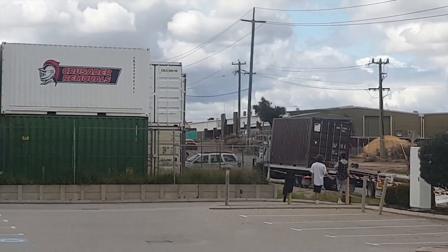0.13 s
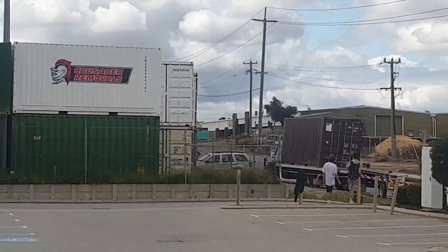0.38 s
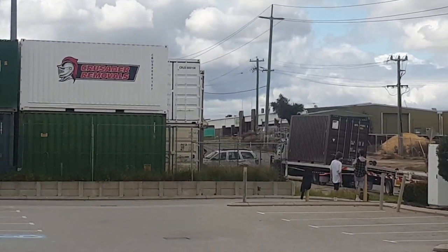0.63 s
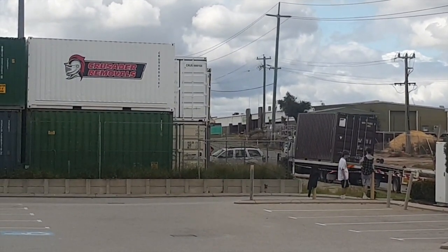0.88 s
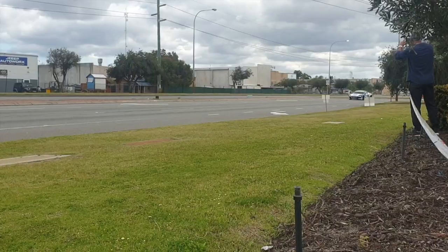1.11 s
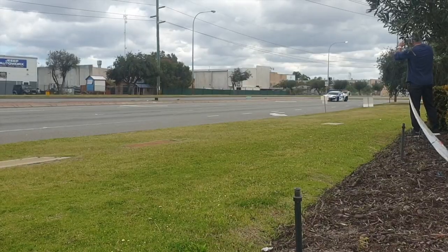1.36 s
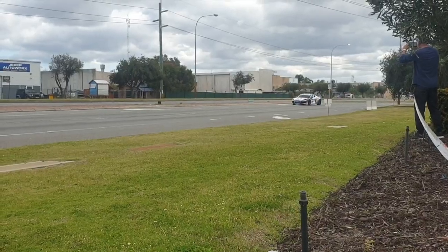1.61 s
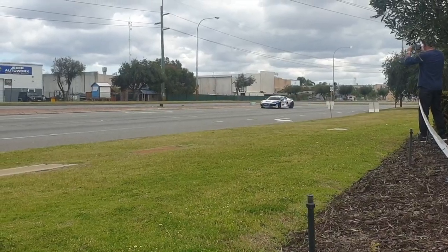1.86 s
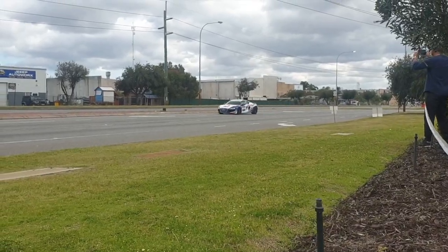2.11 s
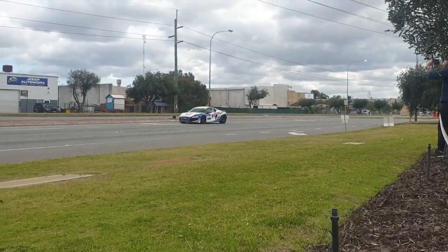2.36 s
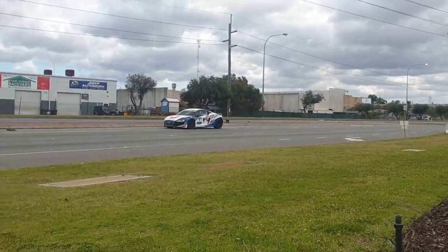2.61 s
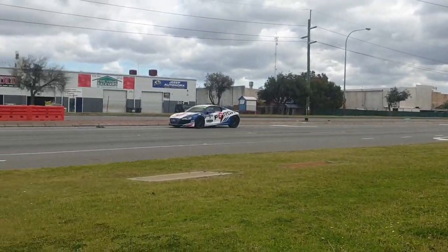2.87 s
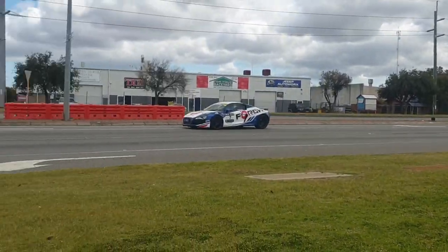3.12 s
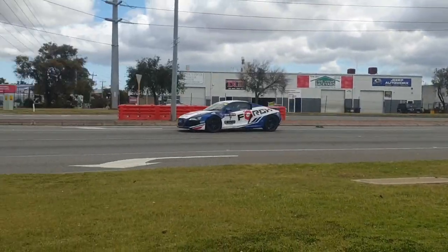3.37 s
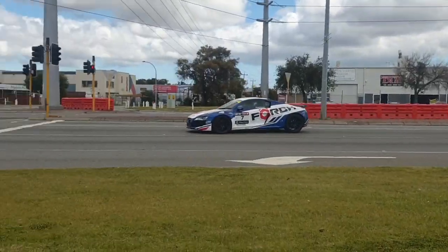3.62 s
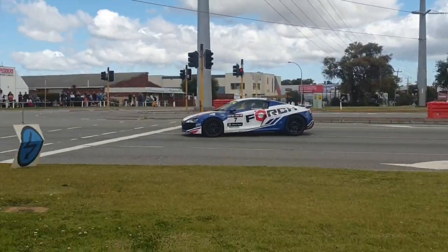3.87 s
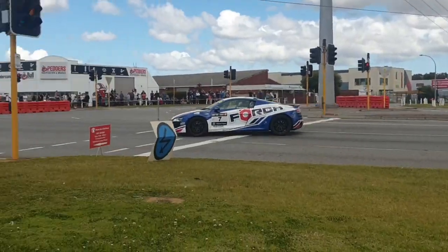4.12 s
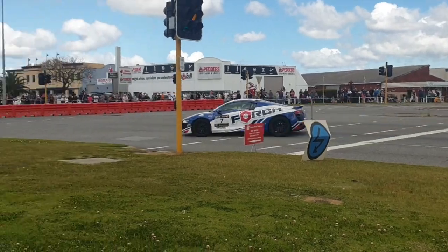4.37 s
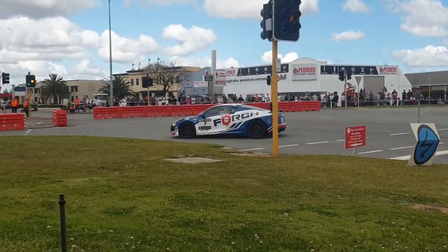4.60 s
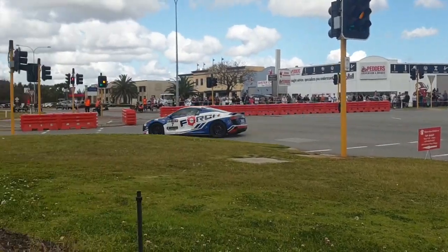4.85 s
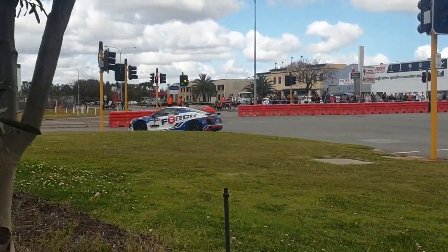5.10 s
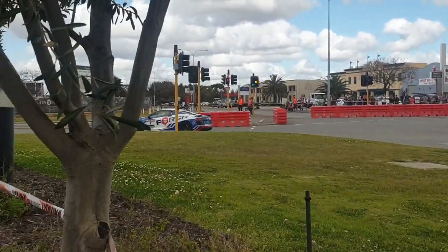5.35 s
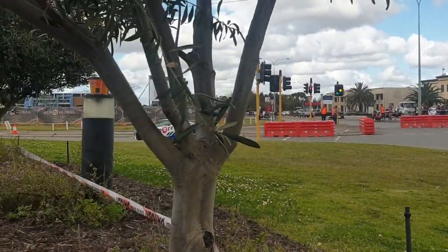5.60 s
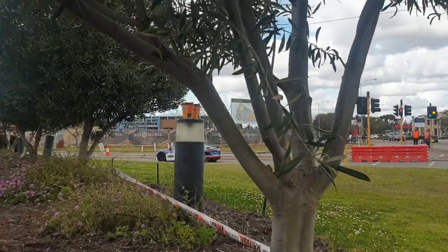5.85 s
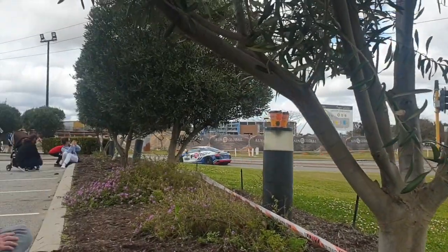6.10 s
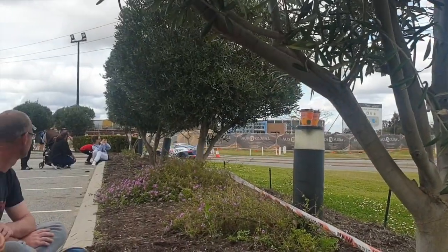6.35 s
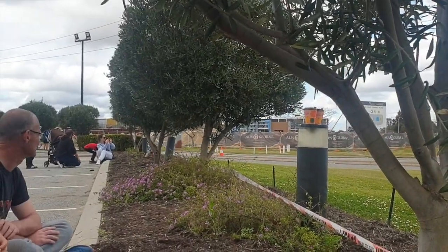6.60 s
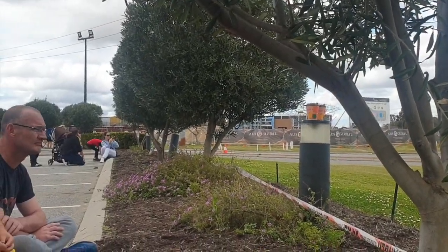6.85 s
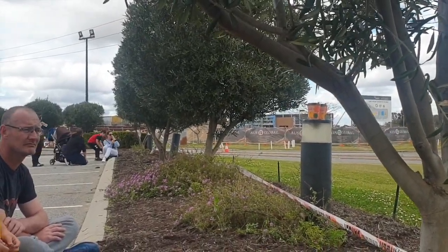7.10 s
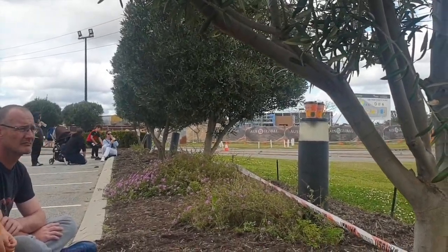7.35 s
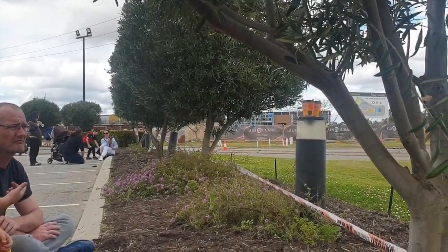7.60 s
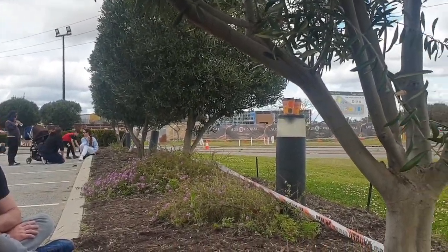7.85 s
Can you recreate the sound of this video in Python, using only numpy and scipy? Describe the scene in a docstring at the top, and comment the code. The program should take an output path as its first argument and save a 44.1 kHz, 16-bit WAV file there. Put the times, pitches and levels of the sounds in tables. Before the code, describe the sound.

Rough V8 roar stops abruptly; after a tiny gap a smoother, buzzy race engine brakes, blips, sweeps past and fades off into the distance.

```python
"""You hear a V8 race car pull hard past a yard, then a click and a short gap. After it a five-cylinder
race car brakes, blips a downshift, coasts round a corner between buildings and accelerates away.
Each exhaust is a stack of sines at multiples of the firing rate. Roar, hiss and wind are shaped noise.
The second car also has late echoes from far walls and two thin ticks close by."""
import sys
import numpy as np
from scipy import signal
from scipy.fft import next_fast_len
from scipy.io import wavfile
from scipy.ndimage import uniform_filter1d

SR = 44100
rng = np.random.default_rng(int(sys.argv[2]) if len(sys.argv) > 2 else 0)


def attenuation_scalar(level_db):
    """Turn a level in dB into a linear amplitude multiplier (20 dB per decade)."""
    decades = np.asarray(level_db, float) / 20
    return 10 ** decades


def dump_mix(stems):
    """Bounce the given channels to the path in sys.argv[1] as a 16-bit WAV at rate SR."""
    frames = np.atleast_2d(stems).T  # one column per channel
    limited = np.clip(frames, -1, 1)  # hard clip at full scale
    pcm = np.round(limited * 32767).astype(np.int16)
    wavfile.write(sys.argv[1], SR, pcm)


N = 351477

# How often a cylinder fires. Each row: time in seconds, firing rate in Hz.
V8_RATE = [(0, 277.5), (.8, 295.9), (.98, 297.8)]
FIVE_RATE = [(1.0, 279), (1.3, 260), (1.8, 234.5), (2.15, 164.3), (2.29, 147), (2.36, 153.4), (2.45, 168.5),
             (2.57, 205.4), (2.71, 257), (2.78, 253.2), (3.1, 231), (3.5, 212.9), (3.9, 195), (4.3, 183.5),
             (4.52, 178.5), (4.66, 181.3), (4.82, 175.1), (4.98, 182.8), (5.14, 178.6), (5.3, 193.9),
             (5.46, 190.8), (6.1, 210.3), (7.1, 253.3), (7.85, 282.8), (7.97, 291.5)]
# The firing tone before its brief dips and swells. Each row: time in seconds, rms level in dB.
V8_TONE = [(0, -21), (0.301, -23), (.4, -19), (.98, -19)]
FIVE_TONE = [(1, -17.5), (1.06, -11.5), (1.6, -11), (1.95, -12.5), (2.2, -20.5), (2.34, -22.5),
             (2.49, -15.5), (2.62, -10), (2.9, -11.5), (3.598, -13), (4, -13), (4.6, -14.5), (5, -13),
             (5.46, -13), (5.75, -15.5), (5.85, -18.5), (6.15, -19.5), (6.27, -16), (6.79, -19),
             (6.92, -22.5), (7.45, -21), (7.8, -15.5), (7.97, -21)]
# Brief dips or swells of the firing tone, as reflections cancel or join it and when the throttle lifts.
# Each row: time in seconds, change in dB, width in seconds.
BEATS = [(.12, -4, 0.019), (.33, -8, 0.013), (.6, 8, 0.021), (.8, 6, 0.033), (.91, -3.5, 0.017),
         (1.04, -13, 0.0056), (1.14, -16.5, 0.08), (1.29, -4, 0.051), (1.475, -12, 0.041),
         (1.75, -4.5, 0.063), (1.91, -9, 0.031), (2.01, -22.5, 0.014), (2.14, -10, 0.017), (2.28, -8, 0.05),
         (2.45, -17, 0.013), (4.64, -6, 0.018), (4.745, -20.5, 0.043), (4.84, -15, 0.038),
         (5.14, -6.5, 0.038), (6.38, -3.5, .035), (7.59, -10.5, 0.14)]
# The other exhaust tones. Each row: time in seconds, rms level in dB at zero effort of the tones at
# 2, 3 and 4 times the firing rate, base level in dB of the remaining orders, their lift in dB per
# octave from the firing tone.
V8_LOAD = [(0, -31.5, -34, -59, -56, 8.77), (.45, -27.5, -31.5, -40, -52.5, 5.8),
           (.65, -26.5, -34, -40.5, -46.5, 1.1), (.98, -28.5, -36.5, -47, -44, 0.21)]
FIVE_LOAD = [(1, -48, -55, -67, -44.5, 0.8), (1.2, -41.5, -44, -68, -43.5, 1.7),
             (1.6, -37, -49, -71, -41.5, -0.3), (2, -31, -58, -58.5, -46, 3.5),
             (2.35, -35, -59.5, -59, -46, 0), (2.66, -29.5, -36.5, -42.5, -35.5, 0.3),
             (2.9, -56, -45, -57.5, -41.5, 2), (3.2, -37.5, -40, -41, -43, 0.8),
             (3.55, -38, -56, -58.5, -49, 7), (3.9, -28.5, -59, -47.5, -47.5, 7),
             (4.3, -33.5, -52, -51, -45.5, 4.5), (4.65, -37, -39.5, -52, -42, 1.4),
             (5.1, -29, -63, -47.5, -37.5, -2.5), (5.24, -24.5, -51.5, -44.5, -45, .1),
             (5.5, -26, -43, -40, -48, 5.5), (5.699, -35.5, -44, -47.5, -52, 3),
             (6, -37, -47.5, -54, -46, -1.8), (6.35, -42.5, -45, -49, -52, -5),
             (6.8, -43, -41.5, -47.5, -52.5, 7), (7.15, -43, -51, -67, -50.5, 6.5),
             (7.47, -38.5, -34, -53, -51.5, 9), (7.97, -34.5, -49.5, -56, -49.5, 5.5)]
# Remaining orders: those between the whole multiples, from unequal cylinders and pipes, and whole
# multiples from the 5th up. Each row: multiple of the firing rate, level in dB over the base level.
V8_ORDERS = [(0.25, 11.5), (0.499, 12.5), (0.75, 11.5), (1.248, -0.5), (1.501, 5), (1.748, -12.5),
             (2.252, -5.5), (2.5, 2), (2.751, -4.5), (3.25, -19.5), (3.5, -24.5), (3.75, -34.5),
             (4.249, -14.5), (4.5, 6.5), (4.75, -18.5), (5.002, -2), (5.254, -6), (5.5, 0.5), (5.75, -6),
             (5.999, 0), (6.25, -16), (6.498, -12.5), (6.752, -16.5), (7.0, -3), (7.249, -13),
             (7.499, -4.5), (7.75, -19.5), (8.0, -6.5)]
FIVE_ORDERS = [(0.2, -23.5), (0.4, -7), (0.6, 1.5), (0.8, 1.5), (1.2, 1), (1.4, -3), (1.6, 1), (1.8, -1),
               (2.199, -9), (2.4, -11), (2.6, -7.5), (2.8, -10.5), (3.2, -13), (3.4, -9), (3.6, -18.5),
               (3.8, -17), (4.2, -17.5), (4.4, -20), (4.6, -28), (4.8, -23), (5.0, -16.5), (5.201, -27.5),
               (5.398, -24), (5.6, -35), (5.8, -25.5), (6.0, -16.5), (6.2, -21), (6.4, -20.5), (6.6, -34.5),
               (6.8, -23), (7.0, -21.5), (7.198, -27), (7.399, -33), (7.6, -32), (7.799, -31), (8.0, -33.5)]
# The V8's highest orders. Each row: multiple of the firing rate, level in dB over the base level.
V8_RASP = [(8.5, -3.5), (9, -8), (9.5, -9.5), (10, -11), (10.5, -13.5), (11, -13), (11.5, -11), (12, -16),
           (13, -17), (14, -15.5)]
# Colour of the remaining orders. Each row: frequency in Hz, gain in dB.
PIPE = [(90, -12), (130, -7), (170, 12), (300, 2.5), (600, -3.5), (1000, -0.5), (1400, -3.2), (1700, -9)]
# Smearing and flutter of the exhaust tones, stronger far off, at the shift and on lifting.
# Each row: time in seconds, roughness from 0 to 1.
V8_ROUGH = [(0, .2), (.98, .2)]
FIVE_ROUGH = [(1, .4), (1.3, .13), (1.9, .2), (2.2, .35), (2.6, .16), (2.8, .04), (4.56, .04), (4.64, .2),
              (4.84, .22), (4.95, .06), (5.7, .07), (6.1, .13), (7.1, .16), (7.5, .35), (7.97, .25)]
# How the cars are driven. Each row: time in seconds, nearness in dB, effort of the engine in dB.
V8_DRIVE = [(0, -9.5, -3), (.1, -2.8, 2.6), (.45, -0.5, 2.3), (.88, -7.5, -3.7), (.98, -3, 1.5)]
FIVE_DRIVE = [(1, -26.5, 4.5), (1.75, -20.5, -3.5), (2.15, -14, -4), (2.38, -4, 1.5), (2.602, -4, 6.5),
              (2.67, -3.5, 9), (2.8, -6.5, 4.5), (3.2, -4.5, 1.3), (3.899, 2, -2), (4.57, 1, -5),
              (4.63, -4, -2.8), (4.798, -1, -8.5), (5, -2, -2), (5.17, -1.5, -6.5), (5.24, -5.5, 3),
              (5.55, -6.5, 5), (5.7, -10, 2.5), (6.05, -17, 2), (6.65, -19.5, 1.1), (7.1, -23.5, 6.5),
              (7.35, -24, 5.5), (7.97, -23.5, 8)]
# Noise levels: exhaust roar, then tyre and intake hiss, then top air. Each row: level in dB at zero
# nearness and effort, dB added per dB of nearness, dB added per dB of effort.
V8_RUSH = [(-37, 0.5, -1), (-35, 1.03, -0.16), (-69, 2.1, .3)]
FIVE_RUSH = [(-48, 0.067, 0.97), (-43, 0.27, 0.91), (-54, 0.32, .3)]
# Shapes of the noise spectra. Each row: frequency in Hz, relative density in dB per Hz.
WIND = [(20, -23.5), (45, -5.5), (70, 5.5), (120, 3.5), (250, -15), (500, -55.5)]
ROAR = [(60, -15.5), (120, 1.5), (350, 0), (700, -8.5), (1300, -10.5), (1700, -18.5), (2400, -16.5),
        (3500, -24), (5000, -49)]
V8_HISS = [(880, -28), (1500, -1), (1650, -1.5), (1850, -13.5), (2400, 0.5), (2620, -9), (3330, -3),
           (4080, -8), (5500, -11), (8500, -28), (11000, -75.5), (18700, -120)]
FIVE_HISS = [(880, -36.5), (1500, -17), (1720, -11), (2170, -2), (2460, -12.5), (3100, -3), (3510, -3),
             (5460, -3), (6940, -9.5), (8500, -21.5), (11000, -47.5), (18700, -120)]
AIR = [(4410, -28.5), (7500, 5.5), (7930, -1), (11200, 0), (12600, -3), (15600, -5)]
# Wind gusts. Each row: time in seconds, dB over calm, width in seconds.
GUSTS = [(0, 14.5, .15), (.35, 9, 0.15), (.93, 18, 0.11), (1.35, 9.5, 0.66), (2.78, 8, .25),
         (4.62, 10.5, 0.12), (5.58, 4.5, 0.053), (6.45, 4.5, 0.14), (7.45, -6, 0.36)]
# Brief swells of the treble. Each row: time in seconds, air change in dB, hiss change in dB,
# width in seconds.
FLURRIES = [(5.236, 1.5, 6, 0.012), (5.275, 1.2, 4, .015), (5.345, 1.2, 3, 0.023), (5.43, 0.5, 3.5, .025),
            (5.48, 0.3, 3.5, .012), (5.55, 1.7, 3.5, 0.018), (5.849, 5.5, 4.5, .06), (6.22, 10, 5, 0.09),
            (6.48, 8.5, 5.5, 0.11), (7, 0.7, 2.5, 0.12)]
# The two microphone ports. Each row: frequency in Hz, likeness of left and right from 0 to 1 before
# the diffuse share is applied, lead of left in radians, dB by which left is louder.
V8_PORTS = [(40, 0.4, 0.32, 8.5), (130, .88, -0.26, 2), (284, 1, 0.21, 2), (640, 0.48, -0.59, 2.5),
            (1850, 0.43, -0.62, 3), (3920, 0.62, 0.9, 3.5), (7000, 0.26, 0.72, 0), (15000, .2, 1.4, -2.5)]
FIVE_PORTS = [(60, 0.16, 0.76, 4.5), (121, 0.98, -0.1, 1.1), (267, 0.9, 0.22, 1.5), (604, 0.6, -0.25, 1.5),
              (1770, 0.19, 0.52, 5), (3220, 1, -1.9, 2), (6000, .8, -1.76, -2.5), (9000, .35, -1.5, -3),
              (15000, 0.25, -1.4, -3)]
# Thin ticks close by. Each row: start in seconds, peak level in dB.
TICKS = [(5.8385, -32), (5.899, -39)]


def evened(x):
    """Scale a signal to an rms of one."""
    return x / np.sqrt(np.mean(abs(x) ** 2) + 1e-20)


def read(points, hz):
    """Read every column of a frequency table at hz, on a log scale."""
    f, *values = np.transpose(points)
    return [np.interp(np.log(hz + 1), np.log(f + 1), value) for value in values]


def follow(rows, t):
    """Read every column of a time table at the times t."""
    s, *values = np.transpose(rows)
    return [np.interp(t, s, value) for value in values]


def bumps(rows, t):
    """Bell-shaped changes of level, in dB."""
    return sum(db * np.exp(-((t - s) / width) ** 2) for s, db, width in rows)


def ports(table, hz, a, b, diffuse=0.99):
    """Left and right microphone port from two unrelated complex signals: the right shares part of a."""
    likeness, lead, left_db = read(table, hz)
    likeness = 1 - diffuse * (1 - np.clip(likeness, 0, 1))
    half = attenuation_scalar(left_db / 2) * np.exp(.5j * lead)  # each side takes half of the difference
    right = likeness * a + np.sqrt(1 - likeness ** 2) * b
    return np.array([a * half, right / half])


def fading(count, width_hz, rate):
    """Slow complex chance: reflected paths drifting in and out of phase."""
    size = next_fast_len(count)
    spectrum = rng.standard_normal((size, 2)) @ [1, 1j]
    slowing = 1 + (np.fft.fftfreq(size, 1 / rate) / width_hz) ** 2
    return evened(np.fft.ifft(spectrum / slowing)[:count])


def rush(size, layers, pair, patchy_db, flicker_db, near_db):
    """Rushing noise from random short-time spectra; the air takes treble from far sound.
    Each layer is (spectrum shape, band in Hz that sets its level, dB curve)."""
    dulling = 0.046  # dB per kHz for each dB of lost nearness
    hop = size // 4
    count = len(layers[0][2])
    frames, hz = count // hop + 5, np.fft.rfftfreq(size, 1 / SR)
    at = np.minimum(np.arange(frames) * hop, count - 1)
    power = 0
    for shape, (low_hz, high_hz), level_db in layers:
        gain = attenuation_scalar(read(shape, hz)[0])
        gain /= np.sqrt(np.sum(gain[(hz > low_hz) & (hz < high_hz)] ** 2))
        power = power + np.outer(gain, attenuation_scalar(level_db[at])) ** 2
    power = power * attenuation_scalar(dulling * np.outer(hz / 1000, near_db[at])) ** 2

    a, b, c, d, patches = rng.standard_normal((frames, len(hz), 5)).T
    patches = uniform_filter1d(patches, size=size // 64, axis=0)
    patches = evened(uniform_filter1d(patches, size=2048 // hop, axis=1))
    flicker = evened(uniform_filter1d(rng.standard_normal(frames), size=3))  # shared by all bins
    unsteady = attenuation_scalar(patchy_db * patches + flicker_db * flicker)
    spectra = ports(pair, hz[:, None], a + 1j * b, c + 1j * d) * np.sqrt(power) * unsteady
    return signal.istft(spectra, nperseg=size, noverlap=size - hop)[1][:, :count]


def wind_roar_and_hiss(count, drive, layers, hiss, firing, pair, gate):
    """Wind and roar below; above them hiss and air that swell at the firing rate, by the share `gate`.
    Nearness and effort set the levels of all but the wind."""
    calm_db = -51
    t = np.arange(count) / SR
    near_db, effort_db = follow(drive, t)
    roar_db, hiss_db, air_db = (db + a * near_db + b * effort_db for db, a, b in layers)
    wind_db = calm_db + bumps(GUSTS, t)
    air_db = air_db + bumps([(s, db, width) for s, db, _, width in FLURRIES], t)
    hiss_db = hiss_db + bumps([(s, db, width) for s, _, db, width in FLURRIES], t)
    low = rush(2048, [(WIND, (30, 100), wind_db), (ROAR, (900, 1800), roar_db)],
               pair, patchy_db=1.5, flicker_db=1.33, near_db=near_db)
    high = rush(256, [(hiss, (2000, 7500), hiss_db), (AIR, (8000, 15000), air_db)],
                pair, patchy_db=2.0, flicker_db=0.84, near_db=near_db)
    firing_hz, = follow(firing, t)
    swelling = 1 + gate * np.cos(2 * np.pi * np.cumsum(firing_hz) / SR)
    return np.pad(low + high * swelling, [(0, 0), (0, N - count)])


def ticks():
    """Very short bright clicks: a 12.5 kHz wave inside a narrow bell."""
    out = np.zeros(N)
    t = np.arange(-40, 40) / SR
    click = np.exp(-(t / .00015) ** 2) * np.cos(2 * np.pi * 12500 * t)
    for s, db in TICKS:
        out[round(s * SR):][:len(t)] += attenuation_scalar(db) * click
    return out


def street(x, delay_s=0.21, t60=1.9):
    """Far walls return the exhaust late, so a glide trails its own earlier pitch.
    The echoes lose 60 dB in t60 seconds, and are kept for one second."""
    t = np.arange(SR) / SR
    sparse = rng.standard_normal((2, SR)) * (rng.random((2, SR)) < .02)
    taps = sparse * attenuation_scalar(-60 * t / t60) * (t > delay_s)
    taps[1] = .9 * taps[0] + .4 * taps[1]  # the right side mostly shares the left's echoes
    return signal.fftconvolve(x, taps / np.linalg.norm(taps[0]), axes=1)[:, :N]


def exhaust(firing, tone, load, orders, rough, pair, drive, size):
    """One sine per engine order, locked to the crank; roughness smears it, reflections make it drift.
    Computed at one sample in `size`."""
    bite = 0.37  # dB gained by the tones at 2, 3 and 4 times the firing rate, per dB of effort
    rate = SR / size
    t = np.arange(firing[0][0], firing[-1][0], 1 / rate)
    hz, = follow(firing, t)
    smear, = follow(rough, t)
    bite_db = bite * follow(drive, t)[1]
    tone_db = follow(tone, t)[0] + bumps(BEATS, t)
    *multiples_db, remaining_db, slope_db = follow(load, t)

    # each line: multiple of the firing rate, level in dB, amount of drift
    lines = [(1, tone_db, 0)]
    for k, db in enumerate(multiples_db, 2):
        lines.append((k, db + bite_db, .16 * (k - 1)))
    for k, db in orders:
        lift_db = slope_db * abs(np.log2(k / 0.97))
        lines.append((k, remaining_db + db + lift_db + read(PIPE, k * hz)[0], .5))

    wander = 1 + .03 * smear * fading(len(t), 5, rate).real
    turns = np.cumsum(hz * wander) / rate
    out = np.zeros((2, N // size + 100))
    for k, level_db, drift in lines:
        a, b, quick = (fading(len(t), width_hz, rate) for width_hz in (4, 3, 22))
        grit = smear * k ** .9  # higher orders are smeared more
        steady = np.exp(2j * np.pi * rng.random())
        wavering = (steady + drift * a + grit * quick) / np.sqrt(1 + drift ** 2 + grit ** 2)
        line = ports(pair, k * hz, wavering, b, diffuse=0.69) * np.exp(2j * np.pi * k * turns)
        out[:, round(t[0] * rate):][:, :len(t)] += np.sqrt(2) * attenuation_scalar(level_db) * line.real
    return signal.resample_poly(out, size, 1, axis=1)[:, :N]


def yard():
    """The V8 pulling away: exhaust tones over one second of noise."""
    pipes = exhaust(V8_RATE, V8_TONE, V8_LOAD, V8_ORDERS + V8_RASP, V8_ROUGH, V8_PORTS, V8_DRIVE, size=4)
    return pipes + wind_roar_and_hiss(SR, V8_DRIVE, V8_RUSH, V8_HISS, V8_RATE, V8_PORTS, gate=0.23)


def corner():
    """The five-cylinder car between buildings: exhaust, its echoes, noise and ticks."""
    pipes = exhaust(FIVE_RATE, FIVE_TONE, FIVE_LOAD, FIVE_ORDERS, FIVE_ROUGH, FIVE_PORTS, FIVE_DRIVE, size=8)
    echoes = attenuation_scalar(-20) * street(pipes)
    rushing = wind_roar_and_hiss(N, FIVE_DRIVE, FIVE_RUSH, FIVE_HISS, FIVE_RATE, FIVE_PORTS, gate=0.091)
    return pipes + echoes + rushing + ticks()


def scene():
    """The two scenes, edited together: a hard stop that clicks, a silence, then a quick fade in."""
    cut_s, resume_s, fade_s = .9773, 1.004, .012
    click_db = -12  # height of the added wave where the hard stop chops it off
    t = np.arange(N) / SR
    click = attenuation_scalar(click_db) * np.exp(np.minimum(t - cut_s, 0) / 0.00019)
    first = (yard() + click) * (t < cut_s)
    fade_in = np.clip((t - resume_s) / fade_s, 0, 1)
    return first + corner() * fade_in


def band_limit(x):
    """A steep low-pass at the top of the band."""
    return signal.sosfilt(signal.butter(12, 15790, fs=SR, output="sos"), x)


def record(dry):
    """The finished mix, as it is stored."""
    return band_limit(dry)


dry = scene()
out = record(dry)
dump_mix(out)
```